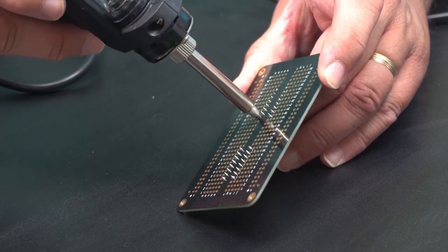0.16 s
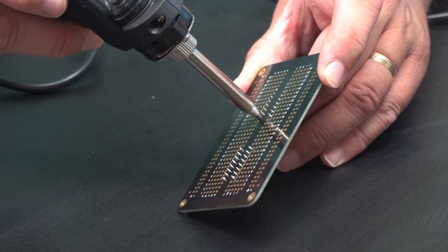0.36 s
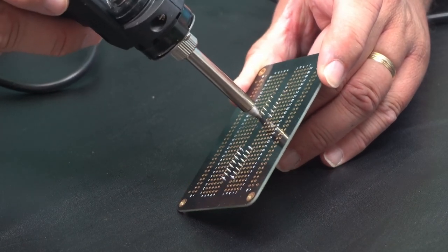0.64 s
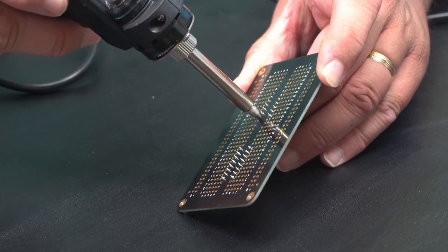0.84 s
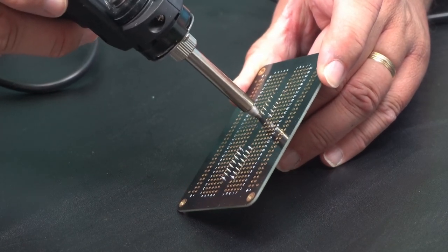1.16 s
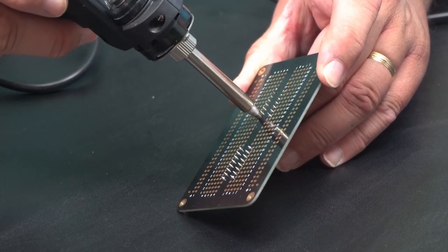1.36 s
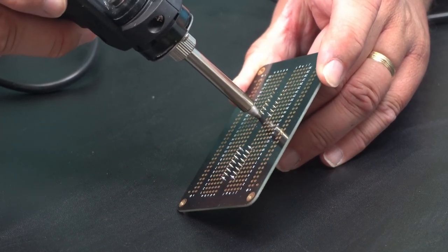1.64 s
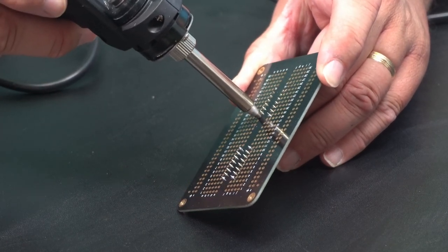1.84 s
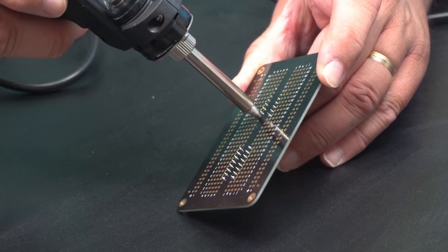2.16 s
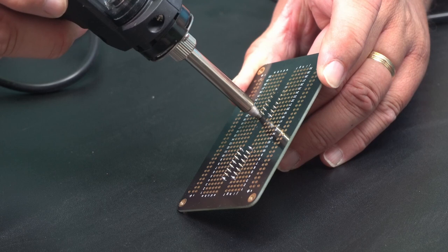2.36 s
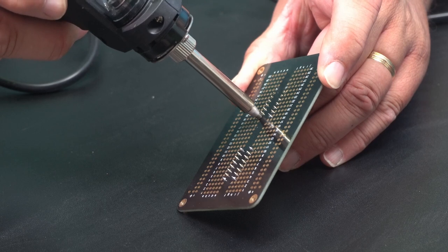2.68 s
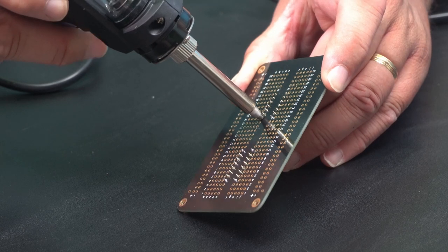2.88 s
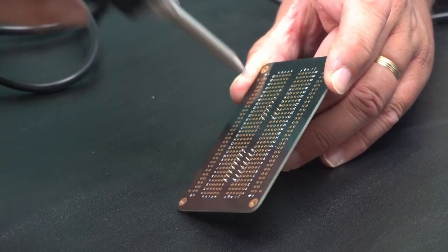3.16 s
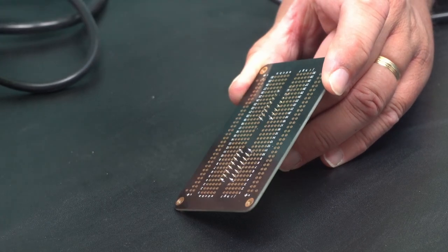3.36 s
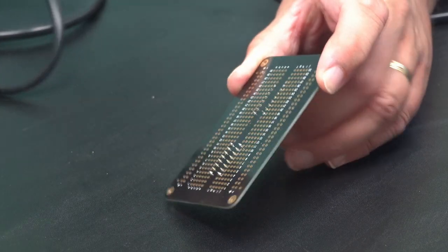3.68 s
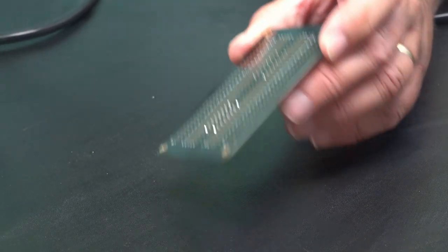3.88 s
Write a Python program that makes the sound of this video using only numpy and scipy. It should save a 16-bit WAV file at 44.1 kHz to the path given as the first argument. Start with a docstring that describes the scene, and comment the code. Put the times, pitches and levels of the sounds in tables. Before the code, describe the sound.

Quiet workshop hum and fan whine, then a sharp trigger snap, a short rough pump buzz with a solder gulp, and a small air hiss.

```python
"""Desoldering gun on a workbench

A desoldering gun clears one joint on a circuit board, close by. The trigger clicks, and a diaphragm pump
spins up, buzzes and coasts down: its thump and buzz are waves locked to the shaft, its air is noise.
The solder is gulped as a squeak with noise, and air hisses in as noise when the nozzle lifts.
Clicks, rattles and a creak of the grip ring the gun's shell. Mains hum, workshop air and a small
cooling fan lie underneath; the fan sags while the pump loads the supply."""
import sys
import numpy as np
from scipy import signal
from scipy.fft import rfft, irfft, next_fast_len
from scipy.io import wavfile

SR = 44100
rng = np.random.default_rng(int(sys.argv[2]) if len(sys.argv) > 2 else 0)


def unload_audio(sound):
    """Save the sound as a 16-bit wav file, at the path given as the first command line argument."""
    columns = np.transpose(np.atleast_2d(sound))
    # keep every value between -1 and 1, then stretch to whole-number steps
    steps = np.round(np.clip(columns, -1, 1) * 32767)
    wavfile.write(sys.argv[1], SR, steps.astype(np.int16))


N = 177008

# strength of each wave in the pump's sound: (multiple of the shaft rate, relative level [dB])
PUMP_PARTIALS = [(1, -5.5), (2, -0.5), (3, -16), (4, -12), (5, -15), (6, -22.5), (7, -27.5), (8, -16.5),
                 (9, -15), (10, -4), (11, -20.5), (12, -15), (13, -24.5), (14, -27.5), (15, -25.5),
                 (16, -57), (17, -23), (18, -23.5), (19, -26), (20, -43), (21, -15), (22, -19.5), (23, -30),
                 (24, -26), (25, -27), (26, -29.5), (27, -42), (28, -47), (29, -39), (30, -26.5), (31, -40),
                 (32, -32), (33, -54), (34, -30), (35, -28), (36, -24), (37, -32), (38, -47.5), (39, -30),
                 (40, -27), (41, -43), (42, -27.5), (43, -34), (44, -49), (45, -37), (46, -36), (47, -42),
                 (48, -42.5), (49, -36), (50, -45), (51, -50), (52, -35)]
# the motor has power between these moments
POWER_ON_S, POWER_OFF_S = 2.002, 2.813
# resonances of the valve flap and of the pump's mount
FLAP_LOW_HZ, FLAP_HIGH_HZ, MOUNT_HZ = 1950, 2720, 313


def from_db(db):
    """Turn decibels into a gain."""
    return 10 ** (np.asarray(db) / 20)


def rms_one(x):
    """Scale to an average strength (rms) of 1."""
    return x / np.sqrt(np.mean(x ** 2) + 1e-20)


def seconds():
    """Give the time of every sample."""
    return np.arange(N) / SR


def since(start):
    """Give the seconds gone by after a moment; 0 before it."""
    return np.maximum(seconds() - start, 0)


def angle(hz):
    """Add up a changing rate into the angle of something turning, in radians."""
    return 2 * np.pi * np.cumsum(hz) / SR


def drift(rate_hz, count=4096):
    """Make slow random wandering with a spread of 1."""
    hz = np.fft.rfftfreq(count, N / SR / count)
    slow = irfft(rfft(rng.standard_normal(count)) / (1 + (hz / rate_hz) ** 2))
    return np.interp(np.linspace(0, count - 1, N), np.arange(count), rms_one(slow))


def noise(colour):
    """Make noise of rms 1 with the given spectrum, rolled off below its first point."""
    points, level_db = np.transpose(colour)
    size = next_fast_len(N, real=True)
    hz = np.fft.rfftfreq(size, 1 / SR) + 1
    gain = from_db(np.interp(np.log(hz), np.log(points), level_db))
    gain *= np.minimum(hz / points[0], 1) ** 2
    return rms_one(irfft(rfft(rng.standard_normal(size)) * gain, size)[:N])


def singing(hz, width_hz):
    """Pass noise through one narrow resonance, as air singing in a slit; rms 1."""
    peak = signal.iirpeak(hz, hz / width_hz, fs=SR)
    return rms_one(signal.lfilter(*peak, rng.standard_normal(N)))


def dying(start, t60):
    """Jump to 1 and die away, falling 60 dB in t60 seconds."""
    age = seconds() - start
    return (age >= 0) * np.exp(-np.log(1000) * np.clip(age / t60, 0, 10))


def swell(start, attack_s, t60, hold_until=0):
    """Rise evenly to 1, perhaps hold, then die away."""
    attack_s = max(attack_s, 1 / SR)
    fade = since(max(start + attack_s, hold_until)) / t60
    return np.minimum(since(start) / attack_s, 1) * np.exp(-np.log(1000) * np.clip(fade, 0, 10))


def spell(middle_s, half_s, change_db):
    """Change a level for a while, with rounded edges, in dB."""
    return change_db * np.exp(-((seconds() - middle_s) / half_s) ** 4)


def fan_speed():
    """Fan blade passes per second: the fan slows under the pump's load and then recovers."""
    free_hz, loaded_hz = 397.75, 356.5
    sag_s, wait_s, recover_s = 0.06, 0.135, 0.5
    load = 1 - np.exp(-since(POWER_ON_S) / sag_s)
    load *= np.exp(-since(POWER_OFF_S + wait_s) / recover_s)
    return free_hz + (loaded_hz - free_hz) * load


def fan(waver_db=0.5):
    """The fan whines at multiples of its blade rate, each swelling as it meets a case resonance."""
    # loudness of a partial wherever it lies: (frequency [Hz], level [dB rms])
    case = [(1080, -64), (1195, -56.5), (1400, -60), (1490, -49), (1535, -69), (1562, -48.5), (1590, -46.5),
            (1780, -55), (1850, -56.5), (1935, -49.5), (1972, -56), (1990, -46.5), (2180, -59.5),
            (2235, -50), (2290, -50.5), (2335, -49), (2390, -57), (2790, -71.5)]
    blade_hz = fan_speed()
    whine = np.zeros(N)
    for k in range(3, 8):
        level_db = np.interp(k * blade_hz, *np.transpose(case)) + waver_db * drift(4.5)
        whine += from_db(level_db) * np.sin(k * angle(blade_hz) + rng.uniform(0, 2 * np.pi))
    return np.sqrt(2) * whine


def mains_hum():
    """Mains hum and faint steady tones of the workshop are plain sine waves."""
    # steady tones: (frequency [Hz], level [dB rms])
    tones = [(50, -56), (100, -46), (200, -56.5), (400, -55.5), (510, -55), (555, -53.5)]
    hum = sum(from_db(level_db) * np.sin(2 * np.pi * (hz * seconds() + rng.random()))
              for hz, level_db in tones)
    return np.sqrt(2) * hum


def workshop_air():
    """The workshop's steady rush is coloured noise."""
    # colour of the rush: (frequency [Hz], relative level [dB per Hz])
    colour = [(30, -16), (60, -8.5), (130, 0.5), (250, 0.5), (520, 0.5), (900, -3), (1400, -9.5),
              (2800, -11), (3700, -16), (5000, -26), (8000, -35), (15000, -43.5)]
    return from_db(-42.5) * noise(colour)


def room(x, t60=0.21, level_db=-17.5):
    """Bench and walls return sound as a short, dull tail of fading noise."""
    tail = dying(0.0015, t60) * noise([(300, -6), (3000, -0.5), (8000, -0.5), (15000, -13)])
    return from_db(level_db) * signal.fftconvolve(x, tail / np.sqrt(np.sum(tail ** 2)))[:N]


def solder_gulp(hz=670, wobble=0.028, second=0.66, air=0.35):
    """Solder drawn up the nozzle squeaks with a wobbling pitch, mixed with rushing air."""
    # gulps: (start [s], level [dB])
    gulps = [(2.072, -23), (2.092, -22)]
    # colour of the gulp's air: (frequency [Hz], relative level [dB per Hz])
    colour = [(200, -13), (550, 7), (1000, -2), (1700, 5), (2600, -14), (5000, -29)]
    swallow = sum(from_db(db) * swell(s, attack_s=0.011, t60=0.06) for s, db in gulps)
    squeak = angle(hz * (1 + wobble * drift(84)))
    return swallow * (np.sin(squeak) + second * np.sin(2 * squeak) + air * noise(colour))


def nozzle_air(tick_t60=0.013, sputter_db=0.9, filled_s=3.205, filled_t60=0.063):
    """The hot tip ticks on the joint; air sputters into the emptied nozzle until it is full."""
    # tiny ticks: (time [s], level [dB])
    ticks = [(0.253, -39.5), (.260, -45), (.679, -53), (1.675, -44), (1.809, -49), (1.834, -52),
             (1.865, -53), (2.055, -30), (3.082, -33), (3.264, -56), (3.706, -52.5)]
    # puffs of air: (start [s], rush level [dB], thin hiss level [dB], t60 [s])
    puffs = [(3.081, -32.5, -40, 0.38), (3.183, -69, -52.5, 0.13)]
    # colours of the rush and of the hiss: (frequency [Hz], relative level [dB per Hz])
    rush_colour = [(200, -26), (600, -2), (1100, -1), (1650, 2.5), (2600, -10), (5000, -10.5), (9000, -26),
                   (15000, -35)]
    hiss_colour = [(2000, -7), (5000, 2), (9000, 0), (14500, 3), (16000, -1.5)]
    flow = from_db(sputter_db * drift(150)) * np.exp(-np.log(1000) * since(filled_s) / filled_t60)
    rush, hiss = np.zeros(N), np.zeros(N)
    for start, rush_db, hiss_db, t60 in puffs:
        puff = flow * swell(start, attack_s=0.021, t60=t60)
        rush += from_db(rush_db) * puff
        hiss += from_db(hiss_db) * puff
    ticking = sum(from_db(db) * dying(start, tick_t60) for start, db in ticks)
    return rush * noise(rush_colour) + (ticking + hiss) * noise(hiss_colour)


def strike(start, ring_db, crack_db, knock_db, bright_hz, length=1, low_hz=2000,
           crack_t60=0.022, contact_cycles=3.25, size=4096):
    """One contact in the gun: a noisy crack, a knock of the lever, and the shell rings briefly."""
    # ringing of the switch lever: (frequency [Hz], relative level [dB], t60 [s])
    lever = [(2346, -5.5, 0.013), (2487, 3.5, 0.0096), (3600, 2.5, 0.011)]
    # ringing of the gun shell, t60 before its length factor: (frequency [Hz], relative level [dB], t60 [s])
    shell = [(770, -28, 0.034), (2100, -41, 0.004), (2714, -2.5, 0.015), (3080, 2, 0.013), (3256, -4, 0.02),
             (3870, -25, 0.012), (4250, -13.5, 0.023), (5390, -15.5, 0.018), (6740, -15, 0.01),
             (9520, -13.5, 0.0063), (10970, -13, .007)]
    age = np.arange(size) / SR
    fall = -np.log(1000) * age
    high_pass = signal.butter(2, low_hz, "high", fs=SR, output="sos")
    crack = signal.sosfilt(high_pass, rng.standard_normal(size))
    hit = from_db(crack_db) * np.exp(fall / crack_t60) * crack
    for hz, mode_db, t60 in lever:
        hit += from_db(knock_db + mode_db) * np.exp(fall / t60) * np.cos(2 * np.pi * hz * age)
    for hz, mode_db, t60 in shell:
        hit += from_db(ring_db + mode_db) * np.exp(fall / (t60 * length)) * np.cos(2 * np.pi * hz * age)
    # a soft contact builds up more slowly and is duller
    hit *= 1 - np.exp(-age * bright_hz / contact_cycles)
    low_pass = signal.butter(2, min(bright_hz, 0.45 * SR), fs=SR, output="sos")
    out = np.zeros(N)
    at = round(start * SR)
    out[at:at + size] = signal.sosfilt(low_pass, hit)
    return out


def grip_creak():
    """The grip creaks in a few quick slips, building up more slowly than a snap."""
    # slips: (time [s], shell ring level [dB])
    slips = [(3.421, -22.5), (3.4249, -14.5), (3.4325, -14.5), (3.4363, -21.5)]
    return sum(strike(s, db, db - 6, db - 3.5, bright_hz=7350, length=1.2, low_hz=1100, contact_cycles=9)
               for s, db in slips)


def pump_rattles():
    """The pump rattles against the gun as it coasts."""
    # rattles: (time [s], shell ring level [dB], contact brightness [Hz])
    rattles = [(2.8393, -20.5, 9000), (2.857, -25, 8997), (2.894, -22, 2200)]
    return sum(strike(s, db, db - 4.5, db + 0.5, bright_hz, contact_cycles=8)
               for s, db, bright_hz in rattles)


def trigger_snaps(bounce_s=0.0036, bounce_db=-16):
    """The trigger snaps when pressed and released; each time the switch bounces once."""
    # snaps: (time [s], shell ring level [dB], ring length [share of the modes' t60], lever knock level [dB])
    snaps = [(2.0016, -0.5, 0.98, -26), (2.8098, -3, 0.45, -7)]
    out = np.zeros(N)
    for start, ring_db, length, knock_db in snaps:
        for lag, loss_db in ((0, 0), (bounce_s, bounce_db)):
            out += from_db(loss_db) * strike(start + lag, ring_db, -9.5, knock_db, 15400, length)
    return out


def shudder(wobble=0.061):
    """The motor's changing torque rocks the pump at its mount's resonance, at start and stop."""
    # shudders: (start [s], level [dB rms], t60 [s])
    shudders = [(2.035, -31, 0.5), (2.818, -27, 0.2)]
    rocking = sum(from_db(db) * swell(s, attack_s=0.035, t60=t60) for s, db, t60 in shudders)
    return np.sqrt(2) * rocking * np.sin(angle(MOUNT_HZ * (1 + wobble * drift(40.3))))


def shaft_speed(spin_up_s=0.027, coast_s=0.105):
    """Turns per second: a quick spin-up, the run, and a slower coast against drag."""
    # speed creeping up as the line empties, before spin-up and coast: (time [s], rate [turns per s])
    running = [(2.09, 74.4), (2.144, 79.6), (2.194, 84.0), (2.32, 89.5), (2.46, 90.8), (2.8, 92.1)]
    speed = np.interp(seconds(), *np.transpose(running))
    return speed * (1 - np.exp(-since(POWER_ON_S) / spin_up_s)) / (1 + since(POWER_OFF_S) / coast_s)


def powered(level_db, delay_s, attack_s, overrun_s, t60):
    """A pump voice builds once the power is on and outlasts it a little."""
    return from_db(level_db) * swell(POWER_ON_S + delay_s, attack_s, t60, POWER_OFF_S + overrun_s)


def once_a_turn(turn, sharpness):
    """Open a rounded gate once in every turn; rms 1."""
    return rms_one(np.exp(sharpness * np.cos(turn)))


def near(hz, centre_hz, width_hz=130):
    """Give 1 on a resonance and 0 far from it."""
    return np.exp(-((hz - centre_hz) / width_hz) ** 2)


def flap_chatter(turn, sharpness=1.5, width_hz=120):
    """The valve flap rings roughly each time it is pulled open."""
    return singing(FLAP_LOW_HZ, width_hz) * once_a_turn(turn, sharpness)


def valve_air(turn, pulsing=0.33, flicker_db=2.5, ring_sharpness=0.66):
    """Air puffs twice a turn through the valves; their slits sing narrowly on one of the puffs."""
    # colour of the air: (frequency [Hz], relative level [dB per Hz])
    colour = [(100, 8), (400, -14), (1000, 13.5), (1500, 8.5), (2600, 6), (3300, 11.5), (4200, 6.5),
              (4900, 4.5), (7600, 3.5), (8700, 4), (11000, -2), (15500, -3)]
    # singing slits: (frequency [Hz], width [Hz], level against the air [dB])
    slits = [(6170, 180, -15), (8600, 550, -9), (9900, 300, -19.5), (14400, 600, -19)]
    air = noise(colour) * (1 + pulsing * (np.cos(turn) + np.cos(2 * turn)) / 2)
    rings = sum(from_db(level_db + flicker_db * drift(60)) * singing(hz, width_hz)
                for hz, width_hz, level_db in slits)
    return air + rings * once_a_turn(turn, ring_sharpness)


def valve_flow(sag_db_per_s=5):
    """Less air passes as the vacuum builds; the valves let go once the power is off."""
    flow = powered(-38, delay_s=0.005, attack_s=0.05, overrun_s=0.04, t60=0.15)
    flow *= from_db(-sag_db_per_s * since(POWER_ON_S))
    vent = from_db(-40) * swell(POWER_OFF_S, attack_s=0.028, t60=0.14)
    return np.hypot(flow, vent)


def thump(turn, speed, full_speed_hz=91.4):
    """The diaphragm's stroke is a low wave, joined by a second one that grows with speed."""
    first, second = from_db(PUMP_PARTIALS[0][1]), from_db(PUMP_PARTIALS[1][1])
    second = second * np.sqrt(speed / full_speed_hz)
    return (first * np.cos(turn) + second * np.cos(2 * turn)) / np.hypot(first, second)


def housing_buzz(turn, speed, settled, flap_dip_db, rough=0.031, uneven_rough=0.26, sway_db=2.04,
                 scatter=1.39, knock_lag=1.6):
    """The housing buzzes at many multiples of the shaft rate; its resonances stay put as they slide."""
    # housing shaken while the run is uneven: (frequency [Hz], relative level [dB])
    housing = [(230, -11), (320, -12.5), (400, -21), (640, -25.5), (740, -22.5), (810, -12), (905, -5),
               (975, -20), (1060, -8.5), (1170, -30.5), (1700, -30.5), (1930, -18.5), (2300, -35),
               (3600, -31.5), (4500, -44)]
    flap_swell_db = spell(middle_s=2.47, half_s=0.1, change_db=5)
    # the pump rocks on its mount until the vacuum has built
    mount_swell_db = spell(middle_s=2.293, half_s=0.19, change_db=4.5)
    buzz, power = np.zeros(N), np.zeros(N)
    for k, partial_db in PUMP_PARTIALS[2:]:
        hz = k * speed
        level_db = settled * partial_db + (1 - settled) * np.interp(hz, *np.transpose(housing))
        level_db += flap_swell_db * near(hz, FLAP_HIGH_HZ)
        level_db += flap_dip_db * near(hz, FLAP_LOW_HZ)
        level_db += mount_swell_db * near(hz, MOUNT_HZ)
        gain = from_db(level_db + sway_db * drift(13))
        roughness = 1 + (rough + uneven_rough * (1 - settled)) * drift(40)
        # the knock follows the thump and is smeared over the turn (lag and scatter in radians)
        phase = k * (turn - knock_lag) + scatter * rng.standard_normal()
        buzz += gain * roughness * np.cos(phase)
        power += gain ** 2
    return buzz / np.sqrt(power)


def pump(wobble=0.0011, uneven_hz=87.8, even_hz=90.3):
    """Each turn pulls the diaphragm once: a low thump, a housing buzz and air through the valves."""
    speed = shaft_speed()
    # the run turns even over this range of shaft speeds: 0 uneven, 1 even
    settled = np.clip((speed - uneven_hz) / (even_hz - uneven_hz), 0, 1)
    turn = angle(speed * (1 + wobble * drift(28)))
    # the valve flap's lower ring drops for a moment
    flap_dip_db = spell(middle_s=2.372, half_s=0.06, change_db=-10)
    thump_gain = powered(-20, delay_s=0.045, attack_s=0.115, overrun_s=0.008, t60=0.16)
    # the diaphragm's own motion is heard longer after the power goes
    thump_gain += powered(-38, delay_s=0.025, attack_s=0.04, overrun_s=0.135, t60=0.08)
    buzz_gain = powered(-22.5, delay_s=0.002, attack_s=0.105, overrun_s=0.021, t60=0.21)
    body = thump_gain * thump(turn, speed)
    body += buzz_gain * housing_buzz(turn, speed, settled, flap_dip_db)
    # the flap chatters whenever the run is uneven
    chatter_gain = powered(-37, delay_s=0.01, attack_s=0.015, overrun_s=0.03, t60=0.15)
    chatter = chatter_gain * (1 - settled) * from_db(flap_dip_db) * flap_chatter(turn)
    return np.sqrt(2) * body + valve_flow() * valve_air(turn) + chatter


def scene():
    """Put the gun close to the microphone, over the workshop's hum."""
    background = fan() + mains_hum() + workshop_air()
    handling = solder_gulp() + nozzle_air() + grip_creak() + pump_rattles() + trigger_snaps()
    return (background + room(handling) + handling + shudder() + pump())[None, :]


def record(dry):
    """The microphone drops the deepest bass, clips any peak beyond 0.95 and cuts the top."""
    low_cut = signal.butter(4, 42, "high", fs=SR, output="sos")
    top_cut = signal.ellip(10, 0.1, 90, 15900, fs=SR, output="sos")
    thin = signal.sosfilt(low_cut, dry)
    return signal.sosfilt(top_cut, np.clip(thin, -0.95, 0.95))


dry = scene()
out = record(dry)
unload_audio(out)
```